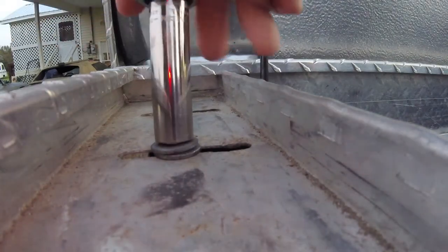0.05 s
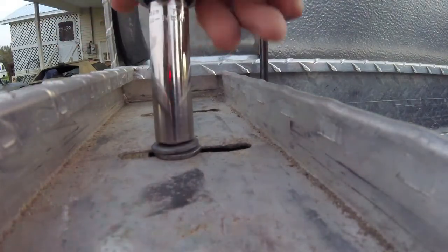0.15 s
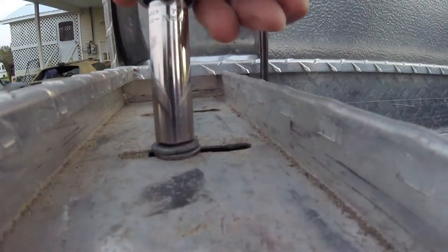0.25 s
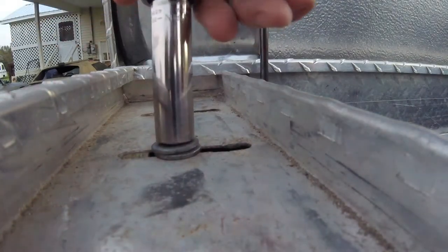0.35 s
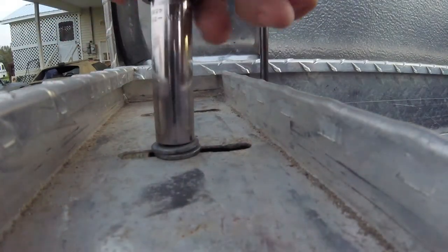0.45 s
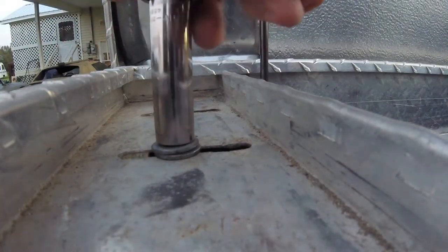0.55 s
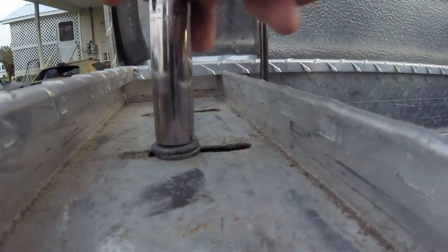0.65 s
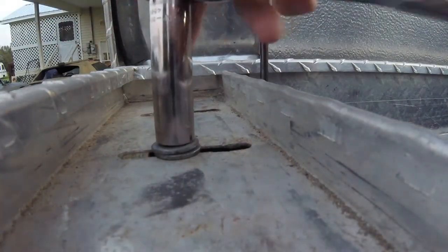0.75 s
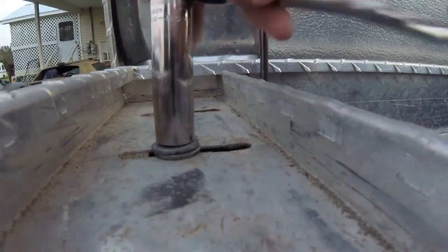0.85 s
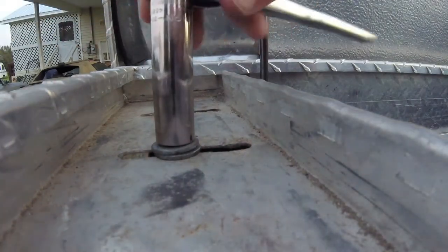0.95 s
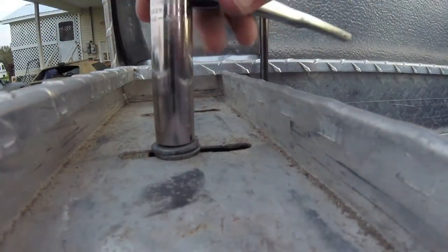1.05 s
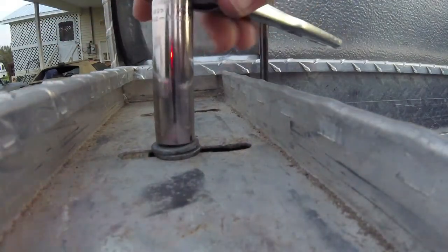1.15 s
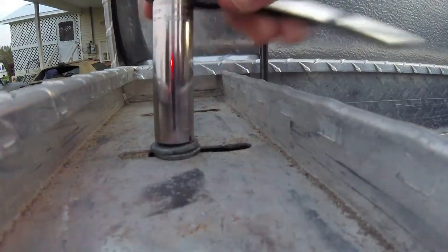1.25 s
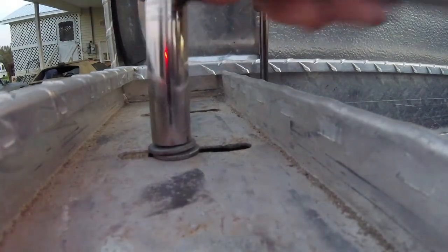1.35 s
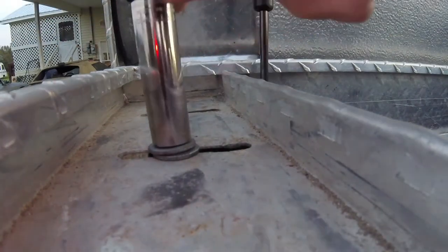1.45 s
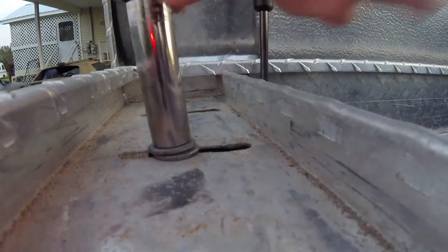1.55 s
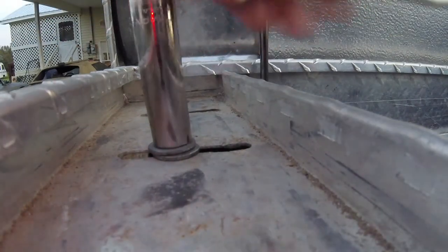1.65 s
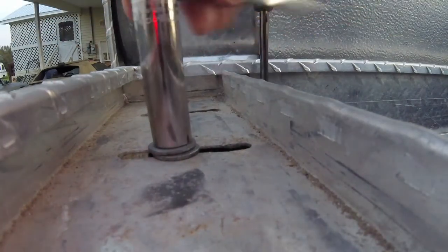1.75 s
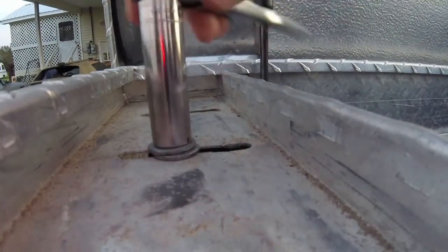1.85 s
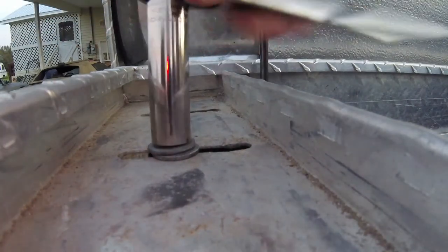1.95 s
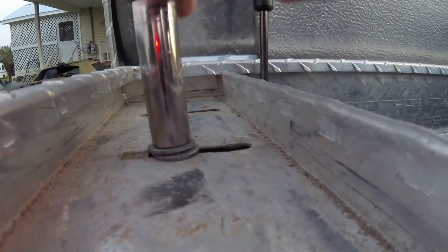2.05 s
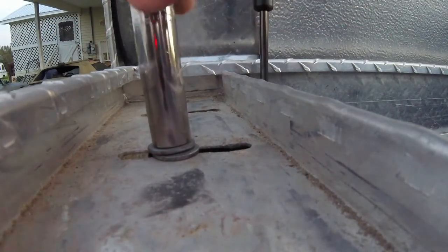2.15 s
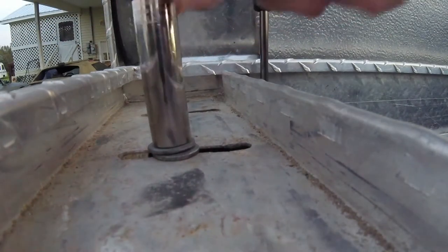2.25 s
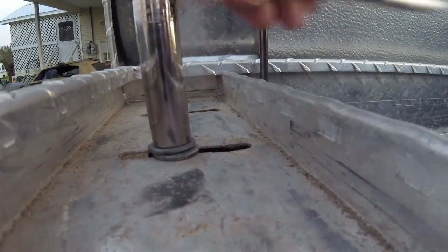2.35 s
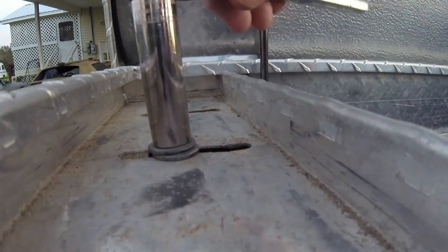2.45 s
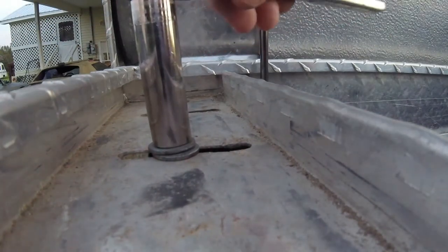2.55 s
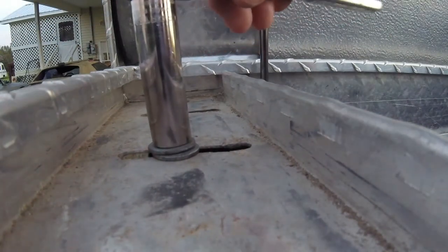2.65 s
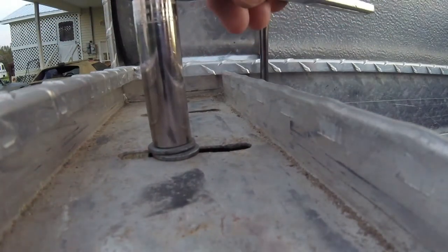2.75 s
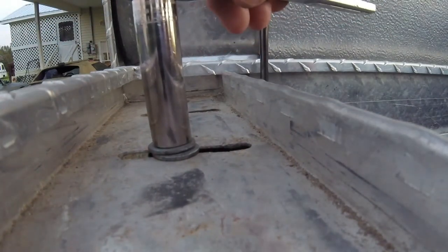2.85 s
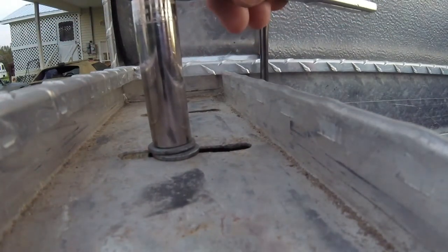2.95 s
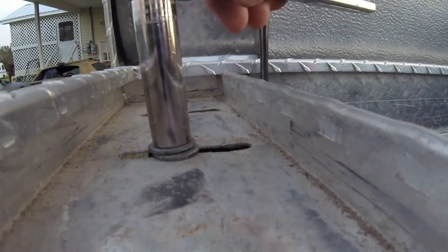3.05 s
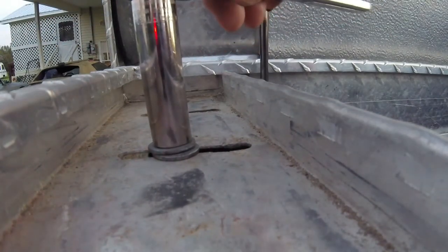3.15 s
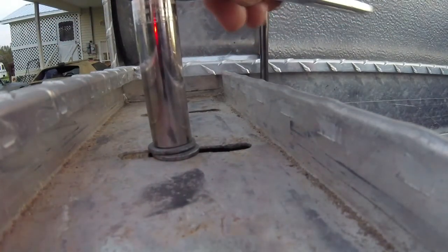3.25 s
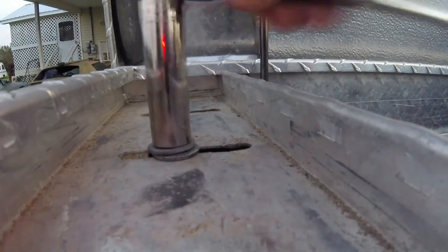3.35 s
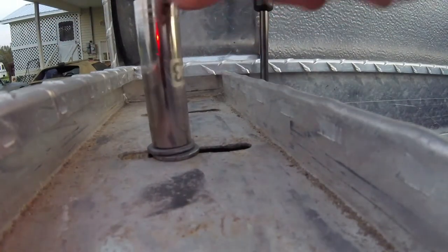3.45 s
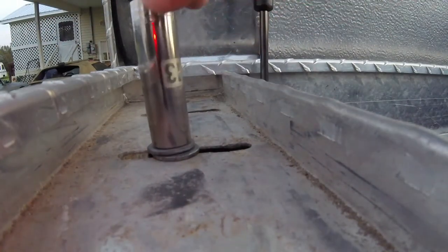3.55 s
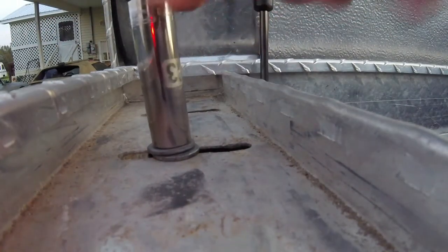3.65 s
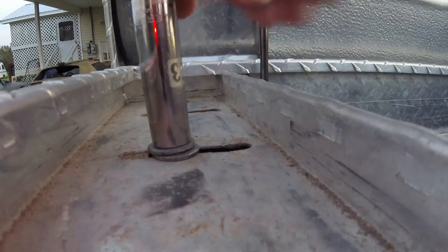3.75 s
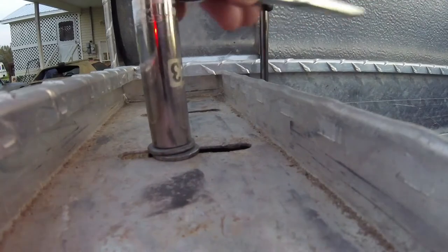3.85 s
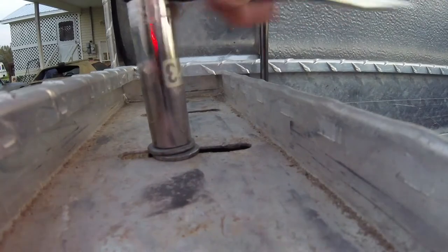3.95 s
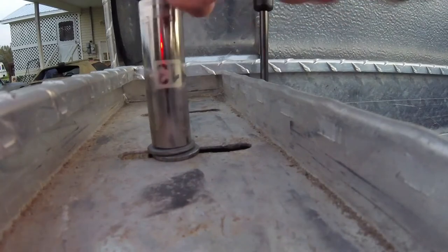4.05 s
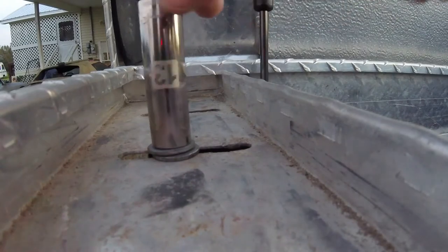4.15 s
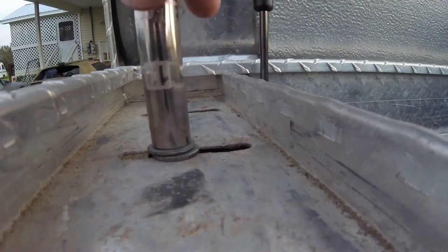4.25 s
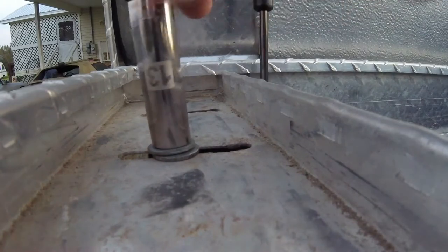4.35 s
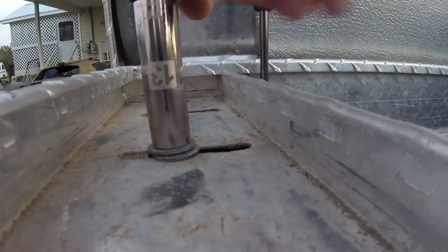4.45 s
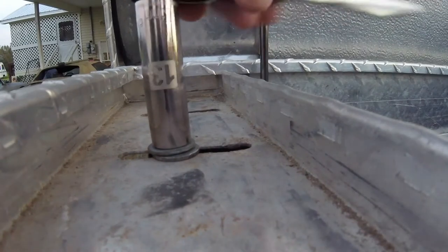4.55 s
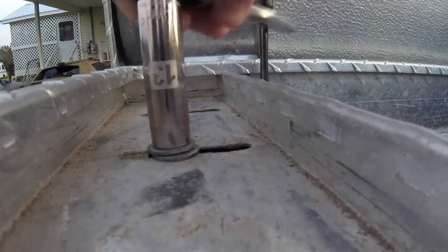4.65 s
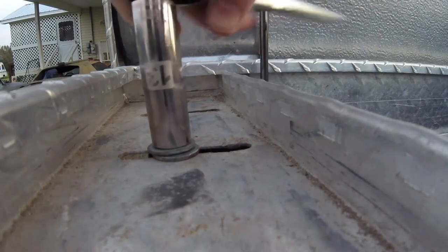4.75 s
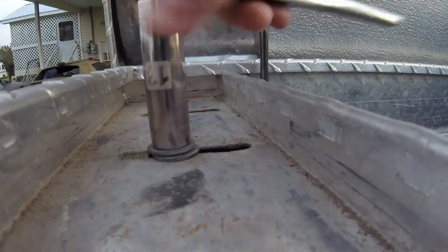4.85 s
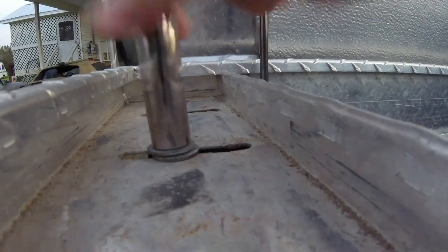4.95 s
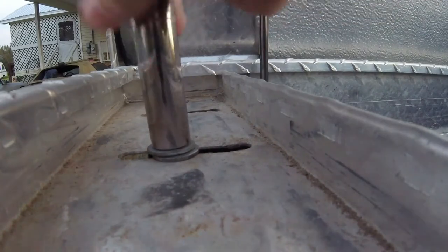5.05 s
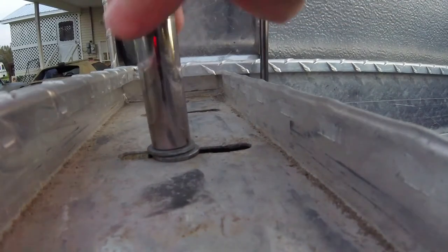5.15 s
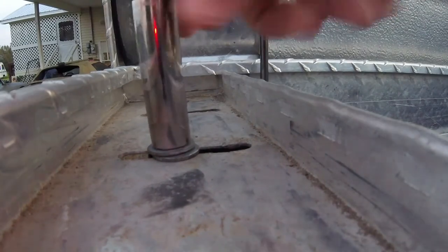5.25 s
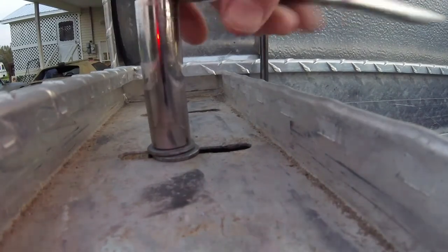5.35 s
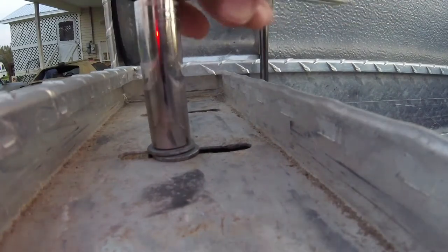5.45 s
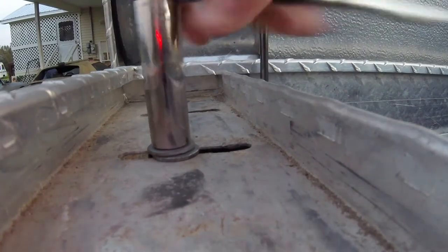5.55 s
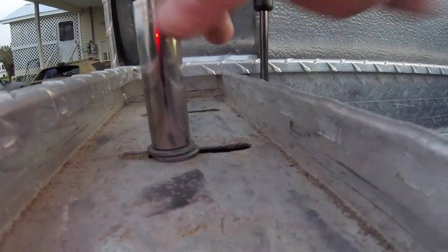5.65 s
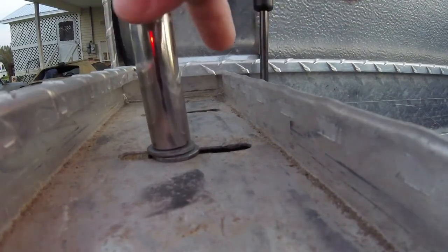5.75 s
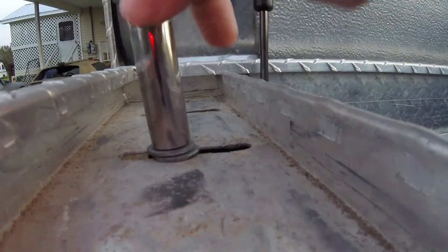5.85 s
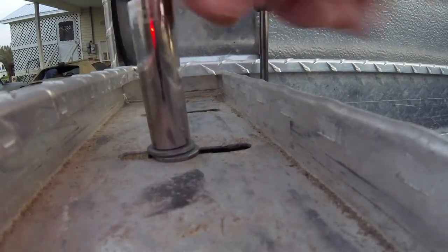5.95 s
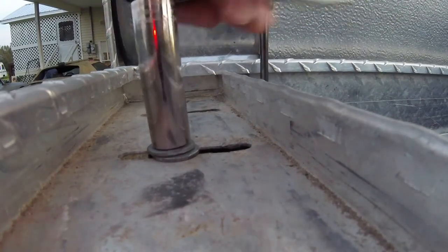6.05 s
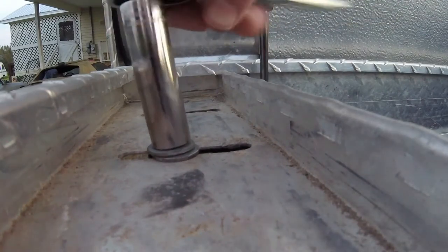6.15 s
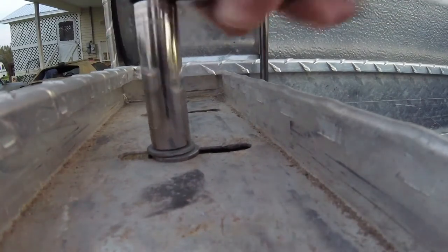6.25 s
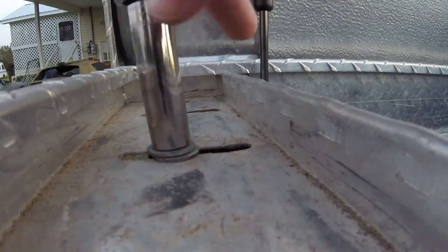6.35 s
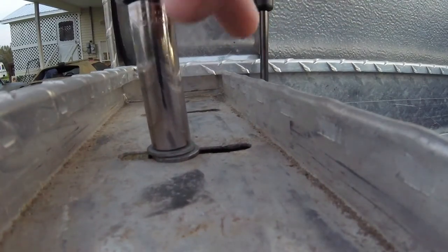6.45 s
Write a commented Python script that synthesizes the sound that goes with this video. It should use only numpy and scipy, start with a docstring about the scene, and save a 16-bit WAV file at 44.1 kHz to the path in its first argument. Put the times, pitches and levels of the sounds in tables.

```python
"""Inside a sheet-metal box, a socket ratchet tightens a nut in the tray.
On each back swing the pawl clicks over the teeth; on each pull the socket knocks on the nut,
the thread grinds and the tray booms. Twice the wrench clanks hard and the whole box rings.
Contacts are short noise bursts plus dying sine waves; friction is random ticks through filters.
A hand rubs the handle now and then, over low outdoor air and a thin hiss."""
import sys
import numpy as np
from scipy import signal
from scipy.fft import rfft, irfft
from scipy.io import wavfile

SR = 44100
rng = np.random.default_rng(int(sys.argv[2]) if len(sys.argv) > 2 else 0)


def store_wav(level_fs):
    """Save 16-bit WAV to argv[1]."""
    pcm = np.round(np.clip(np.atleast_2d(level_fs), -1, 1) * 32767)
    wavfile.write(sys.argv[1], SR, pcm.T.astype(np.int16))


N = 286209
TIME = np.arange(N) / SR
AGE = TIME[:SR // 3]  # seconds since a sound began
TRAY_HZ = 203.3  # usual pitch of the tray
BODY_HZ, TREBLE_HZ = 1500, 4200  # hardness lifts the treble between these two

# All levels in the tables are relative: each sound also has a loudness of its own.
# pawl dropping over a tooth, with that tooth's own tones:
# (t/s, level/dB, treble over body/dB, ring f/Hz, ring level/dB, ping f/Hz, ping level/dB)
CLICK_EVENTS = [(0.8111, -26, 4, 2050, -19.5, 6450, -25.5), (0.8863, -23, 3.5, 2400, -22, 6500, -25),
                (0.924, -27.5, 4.5, 2370, -19, 6130, -26), (0.9587, -28, 7, 1820, -23.5, 6280, -29),
                (1.0002, -25.5, 1.5, 1840, -28, 6160, -35), (1.7334, -13.5, 0.5, 2030, -21, 5930, -20),
                (1.7553, -18, 3, 2070, -19, 6000, -14), (1.779, -18, 1.5, 1500, -19.5, 6030, -17),
                (1.8055, -32, 9, 1510, -38, 6530, -22), (1.8362, -29, 12, 1590, -25, 6350, -24),
                (2.3134, -26, -5, 1680, -35.5, 5460, -36), (2.3866, -22, 9, 2200, -21, 6020, -19.0),
                (2.415, -25.5, 10, 1800, -26, 5970, -31), (2.4463, -30.5, 4, 1700, -28, 5600, -31),
                (3.3121, -26, 7, 1620, -22.5, 6000, -23), (3.7894, -17, 13.5, 1580, -14, 6170, -15),
                (3.8122, -15, 7, 1670, -16, 6250, -18), (3.835, -18, 8.5, 1500, -18, 6700, -27),
                (3.862, -17, 2, 1610, -14.5, 6270, -26), (3.896, -22.5, 8, 1630, -16.5, 6450, -27.0),
                (4.4773, -26, 13, 1870, -21, 6300, -28), (4.5214, -29.5, 11.5, 1640, -22.5, 6630, -20.5),
                (4.5641, -17, 2, 1890, -20.5, 6800, -27.5), (4.5981, -21.5, 0.5, 1640, -21.5, 6800, -25),
                (4.6234, -16.5, -2, 2130, -47, 6100, -26), (4.6466, -14.5, 1.5, 1520, -26, 6140, -28),
                (4.6764, -31.5, 10, 1510, -28, 5850, -43), (4.714, -28, 3, 1600, -23, 6170, -35),
                (5.284, -17, -6.5, 1820, -36, 6340, -38), (5.3499, -19, 5, 2580, -27, 6160, -23),
                (5.3861, -21, 6, 2150, -23, 6120, -21), (5.4224, -22.5, 8, 2110, -16.5, 6000, -20.5),
                (5.4543, -18, -1, 2020, -30, 6410, -22), (5.4936, -24.5, 5, 2160, -24, 6400, -27),
                (5.577, -18, -1.5, 2190, -20.5, 6800, -57), (5.979, -12.5, -7, 1830, -17.5, 6600, -43),
                (6.0183, -17.5, 5, 2600, -17.5, 5960, -21), (6.0383, -10.5, 2, 2080, -13.5, 6050, -15),
                (6.0541, -20, 4, 2620, -24, 5850, -31), (6.079, -19.0, -0.5, 2570, -24, 6510, -27),
                (6.1018, -28, 1, 1840, -31, 6340, -31), (6.1326, -45, 16, 2480, -47, 6700, -33)]
# socket taking up its play on the nut:
# (t/s, level/dB, treble over body/dB, tray boom/dB, ring f/Hz)
KNOCK_EVENTS = [(0.022, -44, -3, -22, 1250), (0.056, -24, -4, -10, 419.0), (0.095, -45, 4, -17.5, 384),
                (0.2, -37.5, 7.5, -21, 1890), (0.248, -35.5, 6, -28, 425), (0.263, -39, 3, -17.5, 980),
                (0.2847, -33, 8, -27, 1940), (0.324, -43, 3, -36.0, 457.0), (0.339, -37, -14, -23, 402),
                (0.367, -38, -4, -39, 414), (0.3948, -32.5, -3, -44, 1910), (0.436, -45, -3, -28, 403.0),
                (0.4675, -38, -7, -31, 760), (0.488, -34, -8, -46, 419.0), (0.5079, -35, -13, -16, 460),
                (0.52, -35.5, -11, -30.0, 706), (0.575, -40, -4, -29, 705.0),
                (0.641, -44, -12.0, -28, 683.0), (1.201, -34.0, 2, -13, 398.0),
                (1.2648, -40, 11, -34.0, 1110), (1.297, -27.5, 0.5, -15, 985), (1.32, -32.5, 2, -40, 549.0),
                (1.357, -24.5, -7, -10.5, 406), (1.6056, -22.5, 5, -3.5, 6370),
                (1.672, -33.5, -7.0, -26.0, 960), (1.6867, -29.5, -6, -11, 1800),
                (1.695, -35.0, -1, -24, 511.0), (1.959, -25, 0.5, -9, 700), (1.999, -34.5, 11, -20, 2040),
                (2.008, -32.5, -6, -20.0, 960), (2.277, -41.5, -10, -21.5, 407), (3.03, -50, -9, -57, 306),
                (3.208, -49, -10, -56, 1870), (3.252, -39, -1, -25.0, 1480), (3.277, -43, -1, -21, 690),
                (3.342, -35.5, -1, -26, 410), (3.3882, -23.5, 1, -10, 382), (3.4067, -25.5, -8.0, -18, 386),
                (3.7204, -23.5, -5, -17, 404), (3.7441, -24.5, -2.5, -17, 404),
                (3.9469, -20, -9, -2.5, 446.0), (4.011, -32, -1, -21, 419.0),
                (4.024, -26.5, -1, -40, 1717.0), (4.04, -21.5, 3.5, -26, 403), (4.0512, -20, -10, -14, 308),
                (4.068, -32.5, -2, -35, 344.0), (4.2909, -32, -11, -29, 405),
                (4.3864, -22.5, 1.5, -19, 1056), (4.42, -37, -12, -16, 403.0), (4.855, -44, 6, -30, 974.0),
                (5.036, -43, 4, -44, 387.0), (5.101, -33.5, 8.5, -11.0, 440),
                (5.111, -31.5, -4.0, -22.5, 382.0), (5.248, -40.5, 2, -20, 804), (5.54, -42, -18, -23, 637),
                (5.595, -31, 0.0, -13, 400), (5.613, -22.5, 5.5, -15, 995), (5.627, -32.0, -9, -18, 775),
                (5.701, -33, -11, -42, 420), (5.9182, -29.5, -6, -13.5, 376.0),
                (5.9504, -26, -1, -9.5, 950), (6.1686, -17, 0.5, -5.5, 370),
                (6.208, -35, -11, -26.0, 376.0), (6.235, -34.5, 7.5, -29, 414),
                (6.255, -40.5, 12.5, -24, 430), (6.276, -41, -11, -26.0, 600)]
# hard steel-on-steel stops: (t/s, level/dB, treble over body/dB)
CLANK_EVENTS = [(1.8481, -13.5, -1.5), (4.7212, -15, -0.5)]
# colour of socket on nut: (f/Hz, level per band/dB)
SOCKET_COLOUR = [(300, -7), (420, -4.5), (600, 3.5), (1100, 2.5), (1700, 0.5), (2500, -4.5), (4200, -10),
                 (6400, -9.5), (8000, -31), (10800, -31), (13000, -37)]


def from_db(db):
    """Decibels to gain."""
    return 10 ** (np.asarray(db) / 20)


def unit_energy(x):
    """Scale to an energy of one."""
    return x / np.sqrt(np.sum(x ** 2) + 1e-20)


def at_hz(points, hz):
    """Read a curve on a log-frequency axis."""
    f, value = np.transpose(points)
    return np.interp(np.log(np.maximum(hz, 1)), np.log(f), value)


def dying(t60):
    """Envelope that falls 60 dB in t60 seconds."""
    return np.exp(-np.log(1000) * AGE / max(t60, 1e-4))


def dying_tone(hz, t60):
    """A sine wave that dies away, with an energy of one."""
    return unit_energy(np.sin(2 * np.pi * hz * AGE) * dying(t60))


def add(out, s, sound):
    """Mix a sound in at time s."""
    i = int(np.clip(round(s * SR), 0, N - 1))
    out[i:i + len(sound)] += sound[:N - i]


def shaped(source, spectrum):
    """Colour a long sound with a spectrum and bring its average (rms) level to 1."""
    hz = np.arange(N // 2 + 1) * SR / N
    coloured = irfft(rfft(source) * from_db(at_hz(spectrum, hz)), N)
    return unit_energy(coloured) * np.sqrt(N)


def band_bank(count=16):
    """Band-passes of about a third of an octave: (centre Hz, filter)."""
    edges = np.geomspace(280, 15500, count + 1)
    return [(np.sqrt(lo * hi), signal.butter(2, [lo, hi], "band", fs=SR, output="sos"))
            for lo, hi in zip(edges, edges[1:])]


def swell(start, length, attack_s, release_s):
    """A movement builds up, holds and dies away."""
    build_up = np.clip((TIME - start) / attack_s, 0, 1)
    return build_up * np.exp(-np.maximum(TIME - start - length, 0) / release_s)


def slips(per_s, size_db):
    """Random stick-slip ticks of uneven size, pushing either way."""
    sizes = from_db(size_db * np.minimum(rng.exponential(1, N), 4))
    return (rng.random(N) < per_s / SR) * sizes * rng.choice([-1, 1], N)


def background():
    """Low outdoor air and a thin hiss that swells and sinks, both made of filtered noise."""
    # level of the hiss: (t/s, level/dB)
    hiss_level = [(0, -54.5), (1.2, -54.5), (2.1, -62.5), (3.2, -62.5), (3.65, -55.5), (4.3, -60),
                  (4.95, -59), (5.3, -64.5), (6.49, -60.5)]
    # spectra of the hiss and of the air: (f/Hz, level/dB)
    hiss_spectrum = [(1500, 6.5), (3500, -6), (5800, -9.5), (6600, 5), (7600, -7), (9000, -6),
                     (10500, -19.5), (13000, 0.5), (15000, -33)]
    air_spectrum = [(25, -0.5), (60, 7.5), (120, 3), (200, 10.5), (300, -3), (420, -11.5), (800, -16),
                    (2000, -43.5), (4000, -56)]
    times, levels_db = np.transpose(hiss_level)
    hiss_gain = from_db(np.interp(TIME, times, levels_db))
    air = from_db(-43.5) * shaped(rng.standard_normal(N), air_spectrum)
    return air + hiss_gain * shaped(rng.standard_normal(N), hiss_spectrum)


def effort(per_dry):
    """Gain of a friction sound over all strokes, changed by per_dry dB for each dB of dryness."""
    # movements of the handle: (start t/s, length t/s, effort level/dB, thread dryness/dB)
    strokes = [(0.0, 0.084, -38.5, -3), (0.219, 0.35, -42.5, 5), (0.613, 0.022, -47.5, 4),
               (0.665, 0.079, -47.5, 10.5), (0.788, 0.23, -45.5, 13), (1.151, 0.25, -40.5, -3.5),
               (1.6, 0.42, -42, 0.5), (2.253, 0.2, -44.5, -2.5), (2.649, 0.18, -56, 5),
               (3.262, 0.19, -41.5, 9), (3.585, 0.1, -50.5, 3), (3.711, 0.365, -41.5, 1.5),
               (4.376, 0.29, -43, 3.5), (4.735, 0.13, -44, -5.5), (5.228, 0.28, -45, 10),
               (5.563, 0.11, -39.5, 12.5), (5.941, 0.33, -42, 1.5), (6.379, 0.041, -51.5, 13.5)]
    return sum(from_db(db + per_dry * dry) * swell(start, length, attack_s=0.0035, release_s=0.044)
               for start, length, db, dry in strokes)


def gritty(ticks, cycles, count=16):
    """Each slip rings one of the wall's resonances, which falls 60 dB in the given cycles."""
    dealt = rng.integers(0, count, N)
    out = 0
    for k, hz in enumerate(np.geomspace(330, 3200, count)):
        r = from_db(-60 * hz / (cycles * SR))  # shrinking per sample
        w = 2 * np.pi * hz / SR  # turn per sample
        own_ticks = ticks * (dealt == k) + 1e-18
        out = out + signal.lfilter([hz * np.sin(w)], [1, -2 * r * np.cos(w), r * r], own_ticks)
    return out


def thread():
    """The nut sticks and slips on thread and washer: tray rumbles, walls grind, steel scrapes."""
    # spectra of the three friction sounds: (f/Hz, level/dB)
    rumble_spectrum = [(60, -32), (110, -17), (150, -21), (175, -7.5), (200, 3.5), (240, 2.5), (290, -13.5),
                       (400, -22), (600, -68)]
    grind_spectrum = [(250, -14), (320, -19), (400, 18), (520, 4.5), (750, 5.5), (1200, -13.5),
                      (2000, -6.5), (2700, -38), (4500, -43)]
    scrape_spectrum = [(1300, 10.5), (2200, 11.5), (3000, 0), (4200, -0.5), (6400, -6), (7500, -7),
                       (10000, -23), (14000, -45)]
    rumble = shaped(slips(per_s=450, size_db=4.5), rumble_spectrum)
    grind = shaped(gritty(slips(per_s=1500, size_db=4.5), cycles=23.0), grind_spectrum)
    scrape = shaped(slips(per_s=1900, size_db=3.0), scrape_spectrum)
    # a dry thread scrapes more and rumbles less
    return (from_db(7.5) * effort(per_dry=-0.35) * rumble
            + from_db(1.5) * effort(per_dry=0) * grind
            + from_db(-15.0) * effort(per_dry=1) * scrape)


def treble_share(hz):
    """How much of the hardness a frequency gets: none in the body, all in the treble."""
    return at_hz([(BODY_HZ, 0), (TREBLE_HZ, 1)], hz)


def strength(rows, hz):
    """How hard each contact drives a frequency, in dB: a harder one is brighter."""
    level_db, hardness = np.transpose(rows)[1:3]
    return level_db + hardness * treble_share(hz)


def chatter(rows, colour, crack_t60, patchy_db, size=1200):
    """Each contact is a short burst of steel chattering on steel, slightly longer in the lows."""
    rows, out, bands = np.array(rows), np.zeros(N), band_bank(count=18)
    noise = rng.standard_normal((len(rows), 2, size))
    # a random level for every contact and band gives each contact its own colour
    patches_db = patchy_db * rng.standard_normal((len(rows), len(bands)))
    sounds = 0
    for k, (hz, band) in enumerate(bands):
        envelope = dying(crack_t60 * (BODY_HZ / hz) ** 0.017)[:size]
        crack = signal.sosfilt(band, noise[:, k % 2] * envelope)
        crack /= np.linalg.norm(crack, axis=1, keepdims=True)
        band_db = strength(rows, hz) + at_hz(colour, hz) + patches_db[:, k]
        sounds = sounds + crack * from_db(band_db)[:, None]
    for s, sound in zip(rows[:, 0], sounds):
        add(out, s, sound)
    return out


def ringing(times, drive_db, modes, spread_db):
    """The point of contact shifts, so every blow drives the ringing tones differently."""
    out = np.zeros(N)
    rings = np.array([from_db(db) * dying_tone(hz, t60) for hz, db, t60 in modes])
    shares = rng.standard_normal((len(times), 2, len(modes)))
    gains = from_db(drive_db + spread_db * shares[:, 0]) * np.sign(shares[:, 1])
    for s, sound in zip(times, gains @ rings):
        add(out, s, sound)
    return out


def contacts(rows, colour, crack_t60, steel_db, patchy_db):
    """A contact chatters and sets the steel ringing."""
    # ring of the wrench, socket and bolt: (f/Hz, level/dB, time to fall 60 dB t/s)
    steel = [(986, 15, 0.026), (1687, 1.5, 0.039), (2204, 0.5, 0.055), (2560, -4, 0.056),
             (2850, -14.5, 0.05), (3460, -4.5, 0.059), (4010, -0.5, 0.043), (4350, -4, 0.05),
             (4660, -3, 0.032), (5000, -4.5, 0.035), (6000, -7.5, 0.025), (6450, -2, 0.065)]
    drive_db = np.transpose([strength(rows, hz) for hz, db, t60 in steel]) + steel_db
    times = [row[0] for row in rows]
    return chatter(rows, colour, crack_t60, patchy_db) + ringing(times, drive_db, steel, spread_db=2.5)


def rattle_rows(spread_db, hardness_db, count=420):
    """Random times for the loose socket's ticks, as strong as the handle's movement then."""
    place, size, hardness = rng.random((count, 3)).T
    s = (np.arange(count) + place) / count * TIME[-1]
    level_db = 20 * np.log10(np.interp(s, TIME, effort(per_dry=0.14)) + 1e-6)
    # below -43 dB of effort the socket stays seated: 1 dB extra lost per dB
    level_db = level_db - np.maximum(-43 - level_db, 0)
    return np.transpose([s, level_db + spread_db * (size - .5), hardness_db + spread_db * (hardness - .5)])


def rattle():
    """The loose socket ticks lightly and at random against the nut while the handle moves."""
    # colour of the small ticks: (f/Hz, level per band/dB)
    rattle_colour = [(300, -20), (420, -8), (600, -9), (1100, -0.5), (2200, 3.5), (3000, -11.5),
                     (4500, -11), (6400, -16), (8000, -22), (13000, -40)]
    rows = rattle_rows(spread_db=10.5, hardness_db=5.5)
    return from_db(8.0) * contacts(rows, rattle_colour, crack_t60=0.017, steel_db=-28.0, patchy_db=5)


def with_rebounds(rows):
    """After each knock the socket rebounds once, weaker and duller, about 6 to 13 ms later."""
    rebound_s = 0.009
    first = np.array(rows)[:, :3]
    second = first + [rebound_s, -13, -9]  # time in s, level in dB, hardness in dB
    second[:, 0] += rebound_s * rng.uniform(-0.369, .4, len(first))
    return np.concatenate([first, second])


def knock_rings():
    """The socket bears on another spot at every knock, so one short tone stands out each time."""
    out = np.zeros(N)
    for s, db, hardness, boom_db, ring_hz in KNOCK_EVENTS:
        tone_db = db + hardness * treble_share(ring_hz) + at_hz(SOCKET_COLOUR, ring_hz)
        add(out, s, from_db(tone_db) * dying_tone(ring_hz, t60=0.033))
    return out


def knocks():
    """The socket knocks on the nut and rebounds: chatter, steel ring and one tone per knock."""
    rows = with_rebounds(KNOCK_EVENTS)
    hits = contacts(rows, SOCKET_COLOUR, crack_t60=0.024, steel_db=-10.0, patchy_db=4.0)
    return from_db(15.0) * hits + from_db(26) * knock_rings()


def tray(blows, detune):
    """The tray's low tones swell and die; slow pushes start softly, hand pressure shifts the pitch."""
    # ring of the tray, before its pitch shifts: (f/Hz, level/dB, time to fall 60 dB t/s, build-up t/s)
    tray_modes = [(216.4, 2.5, 0.057, 0.015), (202.5, -17, 0.22, 0.0085), (163, -29, 0.093, 0.0052),
                  (236.9, -12, 0.12, 0.017), (400.6, -11, 0.051, 0.0013)]
    push_dulls_db = 1121  # dB per octave for each second of build-up
    out = np.zeros(N)
    for (s, level_db, push_s, pitch_hz), shift in zip(blows, rng.standard_normal(len(blows))):
        pitch = pitch_hz / TRAY_HZ * (1 + detune * shift)
        ring = 0
        for hz, db, t60, rise_s in tray_modes:
            mode_db = db - push_dulls_db * push_s * np.log2(hz / tray_modes[0][0])
            envelope = dying(t60) * (1 - np.exp(-AGE / rise_s))
            ring = ring + from_db(mode_db) * np.sin(2 * np.pi * hz * pitch * AGE) * envelope
        ring = ring * (1 - np.exp(-AGE / push_s)) ** 2
        add(out, s, from_db(level_db) * ring / np.max(np.abs(ring)))
    return out


def booms():
    """The bolt passes knocks, clicks and clanks on to the tray, which also gives further low thumps."""
    # further low thumps of the tray, some abrupt, some slow:
    # (t/s, peak level/dB, build-up t/s, pitch of the tray f/Hz)
    thumps = [(0.362, -24.5, 0.001, 205), (0.89, -22, 0.006, 206.6), (1.417, -30, 0.001, 183),
              (1.481, -23.5, 0.0047, 195), (1.727, -25, 0.001, 248), (1.923, -21, 0.0027, 205),
              (2.209, -24.5, 0.00083, 209), (2.755, -26, 0.02, 186), (2.839, -31, 0.011, 202.4),
              (3.021, -26, 0.017, 183), (4.05, -3.5, 0.00056, 170.5), (4.281, -16, 0.0019, 200.4),
              (4.377, -11, 0.0011, 238), (4.648, -16.5, 0.0014, 203.5), (5.018, -24.5, 0.0068, 199),
              (5.588, -16, 0.012, 200.4), (5.698, -21, 0.001, 197), (6.055, -17, 0.012, 201.5),
              (6.265, -17, 0.0036, 204.7), (6.384, -23, 0.00073, 229)]
    knock_blows = [(s, boom_db, .0003, TRAY_HZ) for s, db, hardness, boom_db, ring_hz in KNOCK_EVENTS]
    tick_blows = [(s, db, .0005, TRAY_HZ) for s, db, *tone in CLICK_EVENTS + CLANK_EVENTS]
    knocked = from_db(-1) * tray(knock_blows, detune=0.031)
    ticked = from_db(-8.5) * tray(tick_blows, detune=0.063)
    thumped = from_db(2.5) * tray(thumps, detune=0.0086)
    return knocked + ticked + thumped


def box(x):
    """Dense ringing of the sheet-metal walls: noise in bands, each dying at its own rate."""
    # time to fall 60 dB: (f/Hz, t/s); zero or less means it stops almost at once
    box_t60 = [(300, 0.8), (1000, 0.41), (2200, 0.09), (5000, 0.24), (8000, -0.38)]
    # strength of the ringing: (f/Hz, level/dB)
    box_level = [(300, -9), (1000, -16.5), (2200, -6.5), (5000, -12), (6500, -11), (8000, -22.5),
                 (12000, -33)]
    tail = 0
    for hz, band in band_bank():
        noise = signal.sosfilt(band, rng.standard_normal(len(AGE)))
        build_up = 1 - np.exp(-AGE / 0.00023)
        ring = unit_energy(noise * build_up * dying(at_hz(box_t60, hz)))
        tail = tail + ring * from_db(at_hz(box_level, hz)) * np.sqrt(hz / SR / 2)
    return signal.fftconvolve(x, tail)[:N]


def hand():
    """Skin drags on the handle: dull rubbing through the bolt, grainy brushing as it catches and slips."""
    # the hand shifting its grip: (start t/s, length t/s, dull rubbing level/dB, brushing level/dB)
    grips = [(0.635, 0.027, -61, -43.5), (1.158, 0.18, -33, -40), (2.624, 0.16, -69, -55),
             (2.985, 0.085, -33.5, -53.5), (3.583, 0.048, -53, -49.5), (6.407, 0.033, -52, -45)]
    # spectra of the two sounds: (f/Hz, level/dB)
    rubbing_spectrum = [(40, -11), (80, 18), (135, 23.5), (175, 25), (300, -53)]
    brushing_spectrum = [(250, 0), (450, 7), (1000, -3), (2200, -3.5), (3200, -22), (6500, -15),
                         (10000, -43)]
    dull, bright = 0, 0
    for start, length, dull_db, bright_db in grips:
        movement = swell(start, length, attack_s=0.023, release_s=0.048)
        dull = dull + from_db(dull_db) * movement
        bright = bright + from_db(bright_db) * movement
    catches = signal.fftconvolve(np.abs(slips(per_s=170, size_db=5.0)), dying(0.022))[:N]
    rubbing = shaped(rng.standard_normal(N), rubbing_spectrum)
    brushing = shaped(catches * rng.standard_normal(N), brushing_spectrum)
    return dull * rubbing + bright * brushing


def teeth():
    """Each tooth gives a short ring and a bright ping; pitches change as the pawl moves round."""
    out = np.zeros(N)
    for s, db, hardness, ring_hz, ring_db, ping_hz, ping_db in CLICK_EVENTS:
        add(out, s, from_db(ring_db) * dying_tone(ring_hz, t60=0.017))
        add(out, s, from_db(ping_db) * dying_tone(ping_hz, t60=0.017))
    return out


def pawl_clicks():
    """The pawl drops over the teeth: chatter, steel ring and the teeth's own tones."""
    # colour of pawl on tooth: (f/Hz, level per band/dB)
    click_colour = [(300, -17), (430, -3), (700, -11.5), (1100, -6.5), (1600, -9.5), (2500, -11),
                    (4200, -6.5), (6200, -13.5), (7600, -16.5), (9200, -20.5), (10800, -19.5),
                    (13000, -43.5)]
    drops = contacts(CLICK_EVENTS, click_colour, crack_t60=0.027, steel_db=-16.5, patchy_db=4)
    return from_db(13.0) * drops + from_db(16.5) * teeth()


def bounces(rows, gap_s, first_db, loss_db_per_s, spread_db, count):
    """An uneven, dying run of small contacts after each blow; gap_s is the mean gap."""
    out = []
    for s, db, hardness, *tone in rows:
        for d in np.cumsum(gap_s * (.5 + rng.random(count))):
            level_db = db + first_db - loss_db_per_s * d + spread_db * rng.standard_normal()
            out.append((s + d, level_db, hardness))
    return out


def pawl_skips():
    """After a click the pawl skips up the back of the next tooth in three small contacts."""
    # colour of the skips: (f/Hz, level per band/dB)
    skip_colour = [(300, -29), (1000, 1), (2200, -12), (4200, -6), (6400, -7.5), (8000, -18), (13000, -46)]
    rows = bounces(CLICK_EVENTS, gap_s=.007, first_db=-15.5, loss_db_per_s=132, spread_db=-3.0, count=3)
    return from_db(11.5) * chatter(rows, skip_colour, crack_t60=0.042, patchy_db=2.5)


def clanks():
    """Hard stops of steel on steel: chatter and steel ring."""
    # colour of the clanks: (f/Hz, level per band/dB)
    clank_colour = [(300, -21), (700, -7), (1100, 0.5), (2000, 4.5), (3000, -2.5), (5000, -3), (6400, 2.5),
                    (9000, -15.5), (11000, -30), (13000, -45.5)]
    return from_db(16.5) * contacts(CLANK_EVENTS, clank_colour, crack_t60=0.034, steel_db=-17, patchy_db=1)


def clank_bounces():
    """After a clank the loose socket bounces on, weaker and weaker."""
    rows = bounces(CLANK_EVENTS, gap_s=0.005, first_db=-8.5, loss_db_per_s=213.5, spread_db=1.5, count=16)
    return from_db(13.5) * contacts(rows, SOCKET_COLOUR, crack_t60=0.034, steel_db=-19, patchy_db=2.5)


def wrench():
    """All the wrench's contacts; every kind but the pawl's skips sets the box ringing."""
    loose = knocks() + rattle() + clank_bounces()
    clicks = pawl_clicks()
    hard = clanks()
    into_box = from_db(-2.0) * clicks + from_db(1.1) * loose + from_db(9) * hard
    return clicks + pawl_skips() + loose + hard + box(into_box)


def scene():
    """Everything at the one microphone in the tray."""
    friction = from_db(2) * thread()
    return (background() + friction + from_db(-0.5) * wrench() + booms() + hand())[None]


def record(dry):
    """Peaks are rounded, the microphone fades above 11.6 kHz and the top is cut at 15.5 kHz."""
    top = .85  # the rounded peaks stay below this
    rounded = dry / (1 + (dry / top) ** 4) ** .25
    microphone = signal.butter(8, 11600, fs=SR, output="sos")
    top_cut = signal.cheby2(12, 60, 15500, fs=SR, output="sos")
    return signal.sosfilt(top_cut, signal.sosfilt(microphone, rounded))


dry = scene()
out = record(dry)
store_wav(out)
```